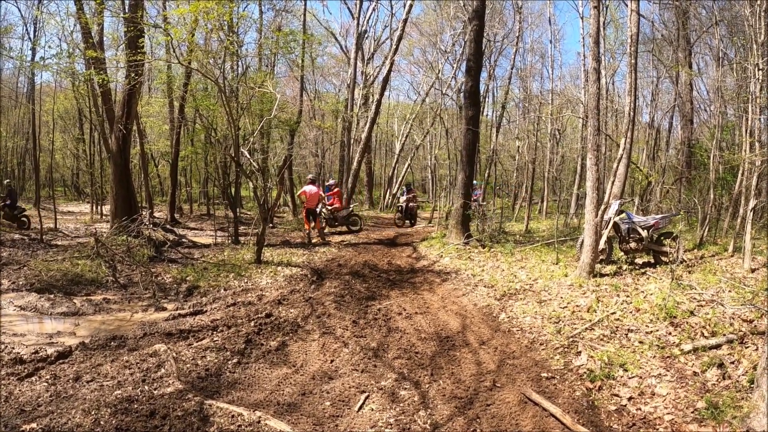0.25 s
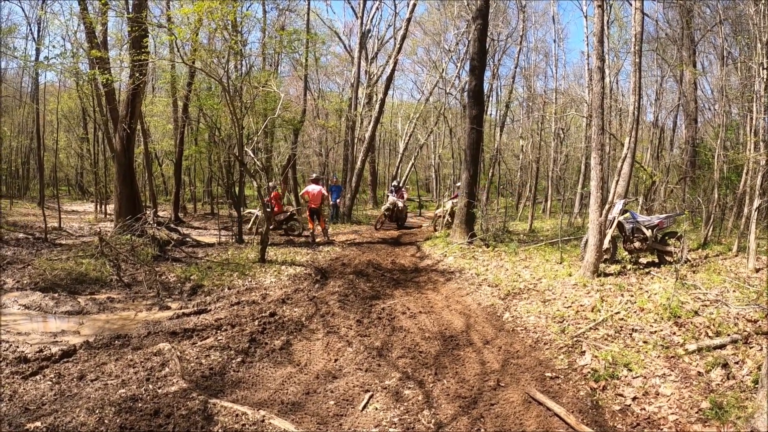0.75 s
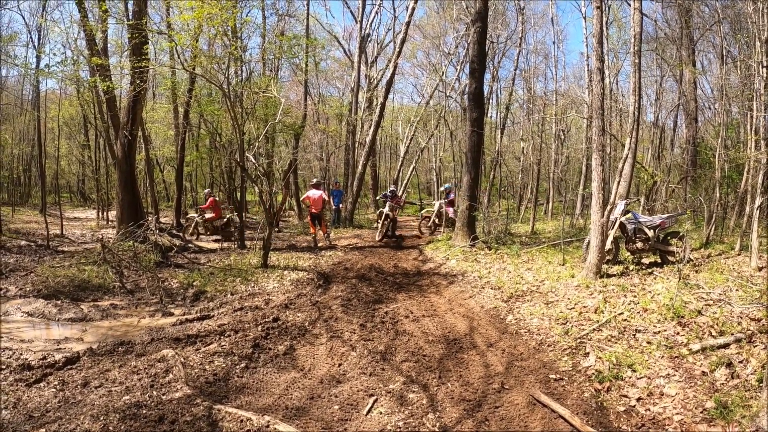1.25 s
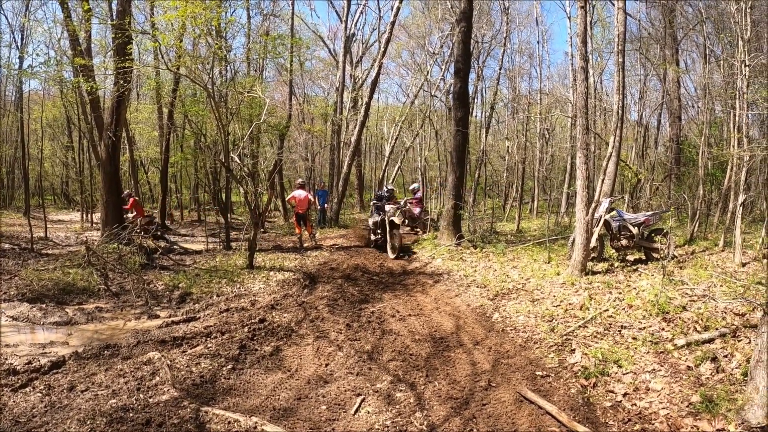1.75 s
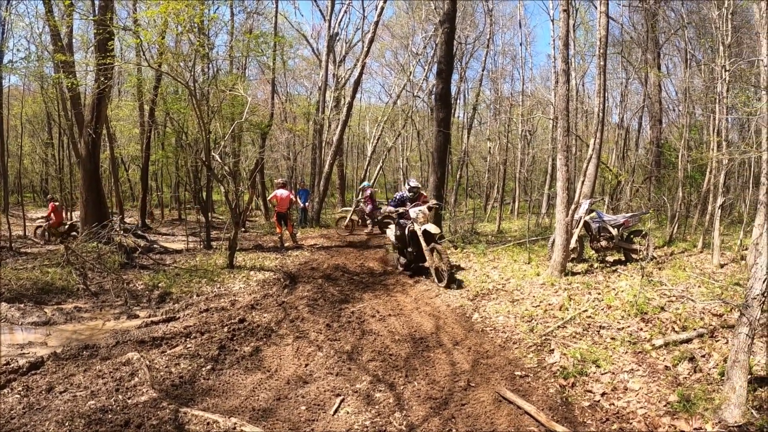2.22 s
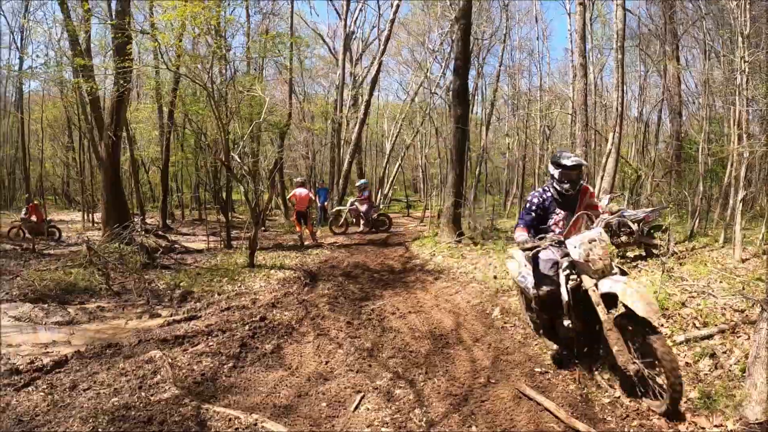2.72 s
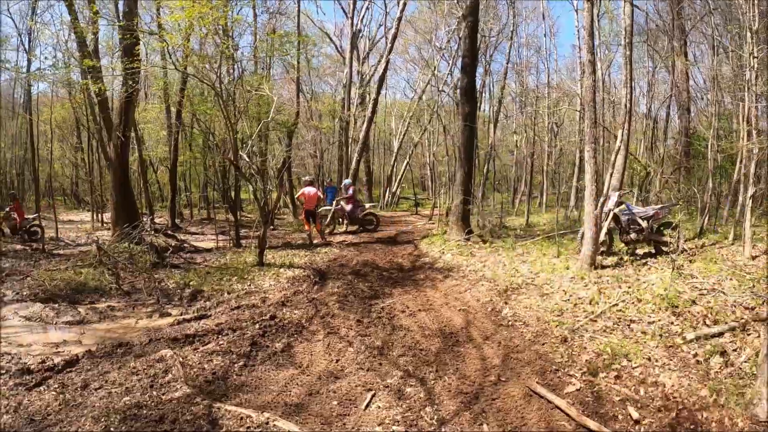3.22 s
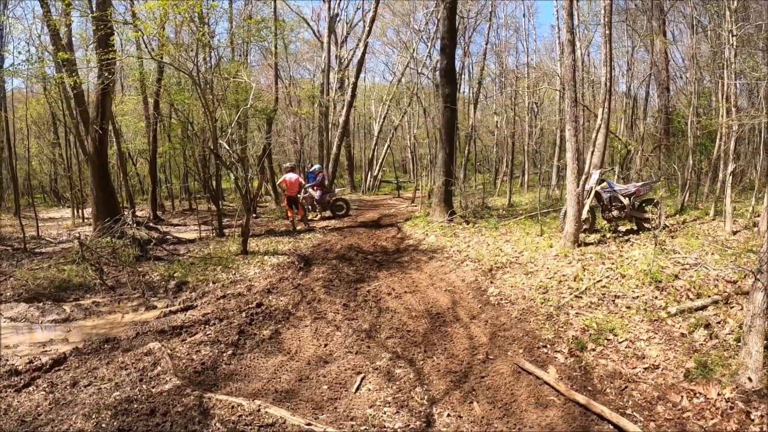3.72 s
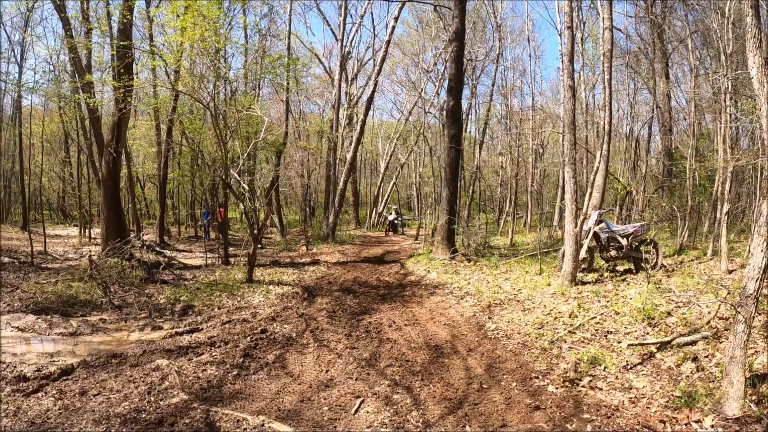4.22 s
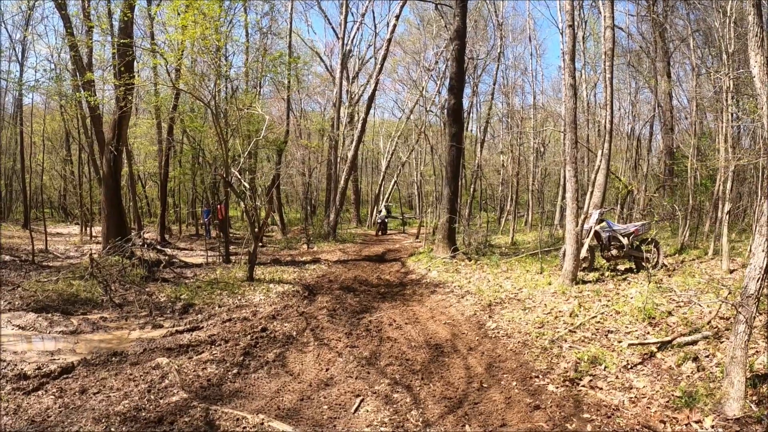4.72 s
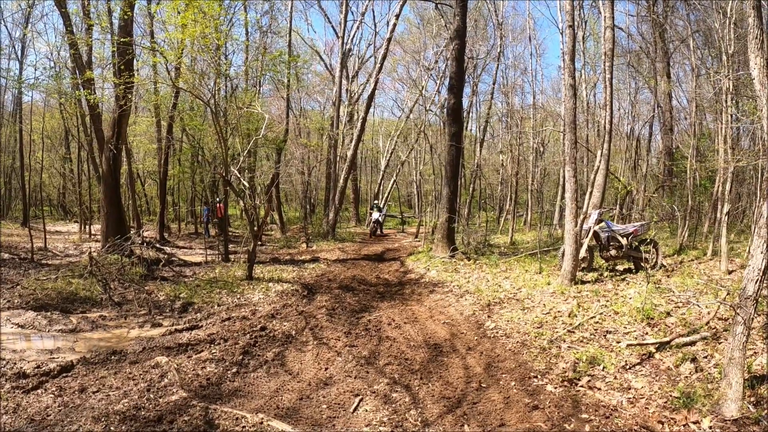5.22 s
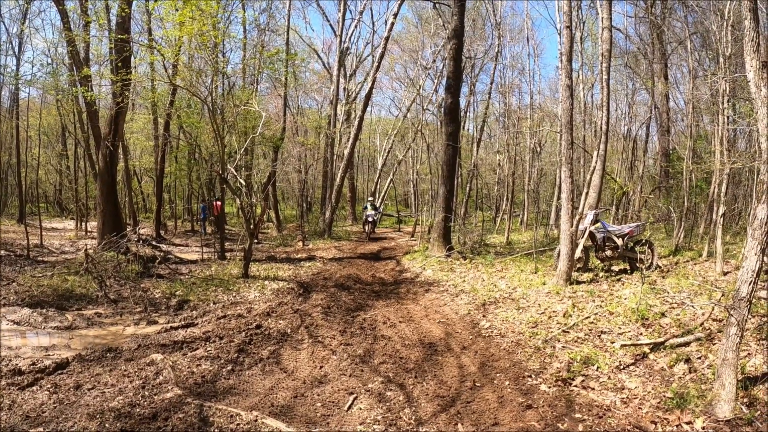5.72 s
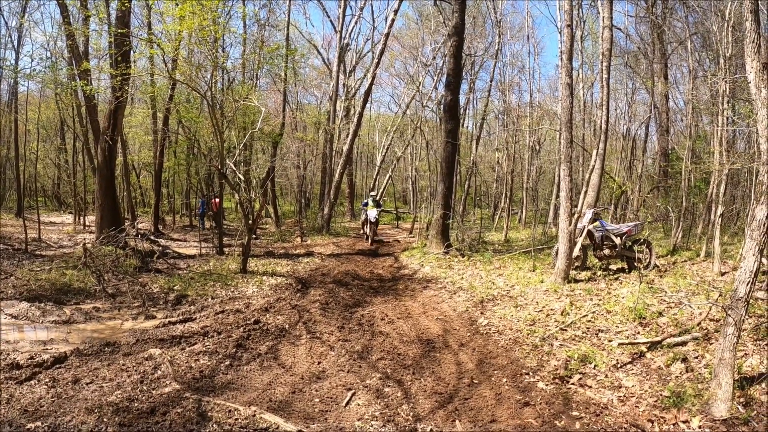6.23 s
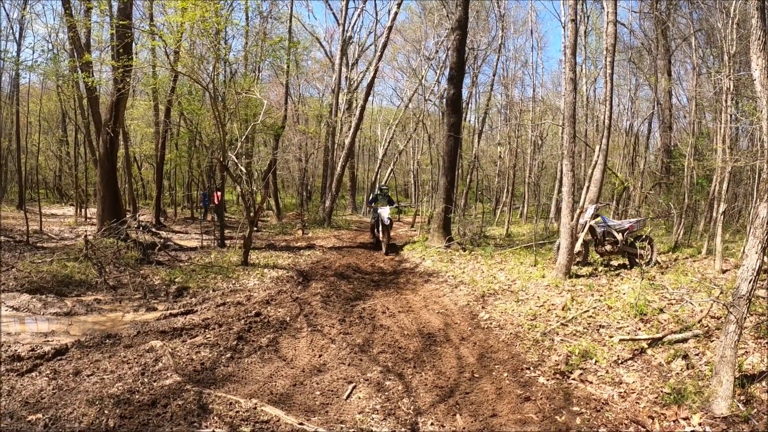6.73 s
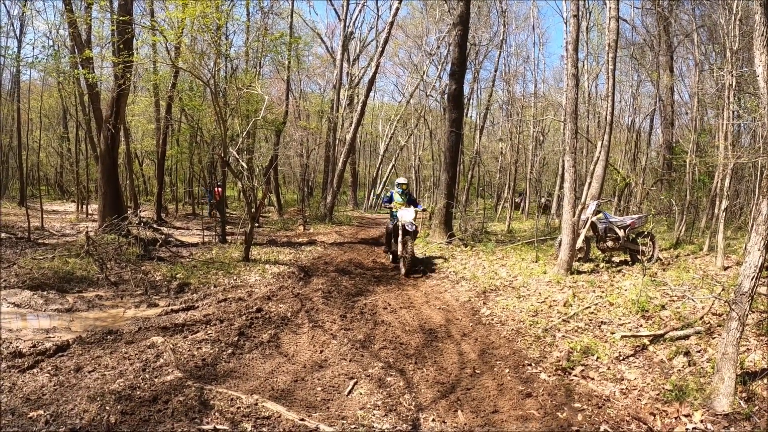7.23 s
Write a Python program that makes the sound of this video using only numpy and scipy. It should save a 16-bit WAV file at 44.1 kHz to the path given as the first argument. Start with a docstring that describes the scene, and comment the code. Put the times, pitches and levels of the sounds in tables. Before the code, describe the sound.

Lumpy motorcycle idling and quick revs, a single-cylinder engine roaring by, an abrupt brief gap, then a faster, raspier bike drawing nearer.

```python
"""Dirt bikes on a woodland trail

Waiting bikes thump at idle and one revs in short bursts; a four-stroke single pulls away and barks past
the listener. After a short silence another bike comes on, blipping its throttle. Each engine is a train of
pressure pulses, one per firing, that excites resonances of exhaust and intake, with turbulent gas as noise.
Tyres and stones are filtered noise, exhaust pops are decaying tones, and tree trunks scatter echoes."""
import sys
import numpy as np
from scipy import signal
from scipy.io import wavfile
from scipy.ndimage import uniform_filter1d

SR = 44100
rng = np.random.default_rng(int(sys.argv[2]) if len(sys.argv) > 2 else 0)


def wav_record(signal):
    """Record a signal, one row per channel, as 16-bit PCM in the file named by sys.argv[1]."""
    frames = np.transpose(np.atleast_2d(signal))
    bounded = np.clip(frames, -1, 1)
    # unit amplitude maps onto the largest positive 16-bit level
    quanta = np.round(bounded * 32767).astype(np.int16)
    wavfile.write(sys.argv[1], SR, quanta)


N = 328986
TIME = np.arange(N) / SR
RESUME_S = 4.15   # the end of the silence
THROTTLE_OPENS_S, THROTTLE_SHUTS_S = 0.027, .042   # time constants


def passing_bike():
    """Source and filter: firing pulses excite pipe and silencer, drier near by; returns body and hiss."""
    # engine speed: time_s, firings_per_s
    speed = [(1.15, 30.78), (1.44, 34.12), (1.87, 35.2), (2.04, 39.79), (2.13, 33.6), (2.35, 42.99),
             (2.48, 31.5), (2.86, 30.83), (2.97, 29.22), (3.23, 37.01), (3.33, 34.12), (3.42, 45.8),
             (3.54, 42.18), (3.71, 43.26), (3.78, 39.44), (3.87, 43.24)]
    # hotter gas carries sound faster and lifts the silencer's resonances: time_s, frequency_ratio
    gas_heat = [(1.25, 0.96), (1.8, 1.03), (2.35, 0.96), (2.6, 1.19), (2.85, 0.85), (3.35, 0.98),
                (3.62, 1.12), (3.9, 1.08)]
    # the rider pulls on the throttle: start_s, length_s, opening (0-1)
    pulls = [(1.195, .27, 0.07), (1.623, 0.43, 0.77), (2.154, 0.21, 1), (2.989, 0.42, 0.6),
             (3.353, 0.4, 0.93)]
    # level of each part, and of its echo: coasting_db, then what is added by
    # full_throttle_db, engine_going_by_db, silencer_going_by_db, mouth_facing_us_db
    mix = {"boom": (-26, 5, -2, 4, 3), "intake": (-19.5, 2.5, 5.5, -4.5, -4),
           "bark": (-30, -0.5, -3, 15.5, 7), "crack": (-29, 7, 1.8, -0.5, -0.5),
           "hiss": (-52.5, 3.5, 9.5, 1.5, 3), "echo": (2, -16, -1, -6.5, -9.5),
           "mouth": (-12.5, -9.5, 11.5, -6.5, 19.5)}
    # resonances of exhaust and intake: frequency_hz, width_hz, level_db
    boom_modes = [(43.7,16,-5.5),(76,13,2),(124.8,14,-13.5)]
    intake_modes = [(172,48,0)]
    mouth_modes = [(435,55,4.5),(590,85,-0.5)]
    crack_modes = [(790,130,1),(993,247,18),(1027,86,10.5),(1300,300,-14.5),(1630,130,-8.5),(1950,320,-5.5)]
    hiss_modes = [(3530,530,8),(4580,260,4),(5130,190,-13.5),(6650,1600,-15.5)]
    intake_tuned_rate = 35.3   # firings per s at which the intake honks as listed
    intake_follows = 0.37   # exponent of its rise with speed

    rate, = in_time(speed)
    heat, = in_time(gas_heat)
    throttle = sum(opening * swell(start, length, THROTTLE_OPENS_S, THROTTLE_SHUTS_S)
                   for start, length, opening in pulls)
    engine_by = going_by(2.983, width_s=0.19)
    silencer_by = going_by(3.215, width_s=0.16)
    mouth_faces = turning(3.32, width_s=0.027)
    causes = np.array([np.ones(N), throttle, engine_by, silencer_by, mouth_faces])
    boom_db, intake_db, bark_db, crack_db, hiss_db, wet_db, mouth_db = np.array(list(mix.values())) @ causes

    clicks = firings(rate, jitter_s=.00008, uneven_db=.6)
    boom = cut(cut(resonate(clicks, boom_modes), 230, "low", order=3), 42, "high", order=4)
    boom = woods(boom, wet_db - 9, t60=.3)

    intake_pulses = returning(delayed(clicks, .0045), share=0.88)
    honk = heated(intake_pulses, intake_modes, (rate / intake_tuned_rate) ** intake_follows)
    intake = cut(cut(honk, 260, "low", order=3), 105, "high", order=3)
    intake = woods(intake, wet_db - 13, t60=0.16)

    blasts = signal.fftconvolve(returning(clicks, share=0.67), blast())[:N]
    pipe = at_level(blasts, 0) + at_level(resonate(clicks, mouth_modes), mouth_db)
    bark = woods(cut(cut(pipe, 170, "high"), 850, "low", order=3), wet_db - 1.0, t60=0.32)

    # each burst returns once from the end of the pipe before it rings the silencer
    burst = clicks + .55 * gas(clicks, puff_s=.0035, steady=.02)
    burst = burst + .75 * cut(delayed(burst, .00525), 1500, "low")
    crack = woods(crack_band(burst, crack_modes, heat, 570, 1995), wet_db - 3.5, t60=0.49)

    rush = gas(delayed(clicks, 0.00092), puff_s=0.0071, steady=0.092)
    hiss = woods(hiss_band(rush, hiss_modes, 5280), wet_db + 5.5, t60=0.061)

    body = at_level(boom, boom_db) + at_level(bark, bark_db)
    body = body + at_level(crack, crack_db) + at_level(intake, intake_db)
    sets_off = turning(1.22, width_s=0.02)
    return sets_off * (TIME < RESUME_S) * np.array([body, at_level(hiss, hiss_db)])


def blast():
    """A decaying chirp: one firing's bark swells, then dies while its note sags as the pipe empties."""
    start_hz, end_hz, sag_s, peak_s = 439, 248, 0.01, 0.0034
    age = TIME[:SR // 20]
    hz = end_hz + (start_hz - end_hz) * np.exp(-age / sag_s)
    envelope = (age / peak_s) ** 2 * np.exp(-2 * age / peak_s)
    ring = envelope * np.sin(2 * np.pi * np.cumsum(hz) / SR)
    return ring / np.linalg.norm(ring)


def returning(x, share):
    """Reflection: a pulse comes back once from the end of the pipe."""
    return x + share * delayed(x, 0.00539)


def tyre_scrub():
    """Impact noise: knobbly tyres tear at the dirt in random grains as the passing bike swerves."""
    grit = rng.standard_normal(N) * (rng.random(N) < 3000 / SR)
    scrub = cut(resonate(grit, [(2280, 470, -5.0), (3380, 510, -4.0)]), 3900, "low", order=4)
    return going_by(2.636, width_s=0.087) * at_level(scrub, db=-37.0)


def stones():
    """Impact noise: stones flung up by the rear tyre make short gritty ticks of resonant noise."""
    # knocks: time_s, level_db (relative)
    flung = [(3.814, -29.5), (3.889, -34.5), (3.899, -31)]
    knocks = sum(from_db(db) * swell(s, .001, .0003, .003) for s, db in flung)
    grit = resonate(rng.standard_normal(N), [(2620, 900, -1), (5300, 1100, 2)])
    return knocks * cut(grit, 5900, "low", order=4)


def oncoming_bike():
    """Source and filter: a faster, rougher pulse train drives speed-tuned pipes; returns body and hiss."""
    # engine speed before its waver: time_s, firings_per_s
    speed = [(4.2, 55.8), (4.5, 55.55), (4.62, 51.6), (4.76, 54.3), (5.2, 54.7), (5.28, 58), (5.37, 62.4),
             (5.48, 63.1), (5.65, 61.2), (5.93, 63.6), (6.06, 56), (6.13, 60), (6.19, 54.5), (6.29, 65),
             (6.35, 62), (6.44, 54), (6.52, 58.5), (6.56, 56), (6.64, 61), (6.7, 59.5), (6.78, 51.5),
             (6.85, 58), (6.94, 62), (7.0, 60.5), (7.11, 49.5), (7.22, 58), (7.3, 64), (7.45, 55.6)]
    # the rider holds, then blips the throttle: start_s, length_s, opening (0-1), gulp_of_air (0-1)
    blips = [(3.998, 0.55, 0.54, 0.12), (4.643, 0.57, 0.48, 0), (5.239, 0.73, 0.87, 0.3),
             (6.122, 0.23, 0.82, 1), (6.476, 0.26, 0.77, 1), (6.784, 0.22, 0.73, 0.27),
             (7.144, 0.22, 0.68, 0.8)]
    # level of each part (the hiss also sets the edge): coasting_db, then what is added by
    # full_throttle_db, full_gulp_db, nearing_db_per_s, close_by_db
    mix = {"boom": (-32.5, 6.5, 2, 2.5, -1), "note": (-43, 21.5, 3.5, 1.3, 1),
           "bark": (-38, 6.5, 6.5, 1.6, 0.5), "crack": (-33, 4.5, 1, 1.76, 21),
           "hiss": (-65.5, 13, 0, 3, 1)}
    # exhaust resonances: frequency_hz, width_hz, level_db
    boom_modes = [(69.5,25,-1.5),(115,32,2.5),(188,19,-1)]
    note_modes = [(247.7,35,0)]
    bark_modes = [(340.4,45,3),(391,50,4),(438,38,0.5),(665,110,-10.5)]
    crack_modes = [(938,81,-13),(984,40,3),(1145,64,8.5)]
    edge_modes = [(1646,81,-11),(2023,130,-14.5)]
    hiss_modes = [(2980,180,7),(3650,1200,-2.5),(4730,1000,13.5),(5100,120,12.5),(5850,400,-4)]
    pipe_tuned_rate = 61.06   # firings per s at which the pipe's low notes are as listed
    pipe_follows, heat_follows = 0.68, 0.51   # exponents of the rise with speed: low notes, silencer
    speed_waver, heat_waver, wavers_per_s = 0.00301, 0.049, 12   # never quite still: share, share, per s
    putter_db, putters_per_s = 3, 45   # the low thuds come unevenly: spread, changes per s
    gulp_s = 0.1   # the intake growls until the engine catches up with the throttle

    throttle = sum(opening * swell(start, length, THROTTLE_OPENS_S, THROTTLE_SHUTS_S)
                   for start, length, opening, _ in blips)
    gulps = sum(gulp * swell(start, gulp_s, THROTTLE_OPENS_S, THROTTLE_SHUTS_S)
                for start, _, _, gulp in blips)
    rate, = in_time(speed)
    rate = rate * (1 + speed_waver * waver(wavers_per_s))
    relative_speed = rate / pipe_tuned_rate
    heat = relative_speed ** heat_follows + heat_waver * waver(wavers_per_s)
    pipe_heat = relative_speed ** pipe_follows
    causes = np.array([np.ones(N), throttle, gulps, TIME - RESUME_S, going_by(7.66, width_s=0.1)])
    boom_db, note_db, bark_db, crack_db, hiss_db = np.array(list(mix.values())) @ causes

    clicks = firings(rate, jitter_s=.00012, uneven_db=1.5)
    burst = clicks + .35 * gas(clicks, puff_s=.005, steady=.25)
    thuds = clicks * from_db(putter_db * waver(putters_per_s))
    boom = cut(cut(heated(thuds, boom_modes, pipe_heat), 230, "low", order=5), 64, "high", order=4)
    boom = woods(boom, -9, t60=.2)
    note = cut(cut(heated(clicks, note_modes, pipe_heat), 200, "high", order=3), 320, "low", order=3)
    bark = cut(cut(heated(burst, bark_modes, pipe_heat), 280, "high", order=3), 490, "low")
    bark = woods(bark, -9, t60=.18)

    ring = cut(crack_band(burst, crack_modes, heat, 884, 2410), 806, "low", order=3)
    edge = cut(cut(heated(burst, edge_modes, heat), 1600, "high"), 1975, "low", order=12)
    # an open throttle sharpens the note
    crack = woods(ring + from_db(1.2 * (hiss_db + 47.5)) * edge, -2, t60=.22)
    hiss = hiss_band(gas(clicks, puff_s=0.016, steady=0.59), hiss_modes, 5220)

    body = at_level(boom, boom_db) + at_level(bark, bark_db)
    body = body + at_level(crack, crack_db) + at_level(note, note_db)
    return (TIME > RESUME_S) * np.array([body, at_level(hiss, hiss_db)])


def pops():
    """Damped oscillation: unburnt fuel knocks dully in the oncoming silencer now and then."""
    # knocks: time_s, onset_level_db (before the low-pass)
    knocks = [(4.503, -19), (4.762, -23), (5.71, -21)]
    out = np.zeros(N)
    for s, db in knocks:
        age = np.maximum(TIME - s, 0)
        out += from_db(db - 60 * age / 0.034) * np.sin(2 * np.pi * 630 * age)
    return cut(out, 1200, "low", order=3)


def revving_bike():
    """Source and filter: bursts of throttle drive pipe resonances that rise with the engine speed."""
    # bursts: start_s, length_s, first_firings_per_s, last_firings_per_s, boom_db, crack_db,
    # pipe_note_at_end (frequency ratio)
    bursts = [(0, 0.056, 58, 65, -17, -43, 1.09), (0.07, 0.11, 55, 66, -16.5, -41, 1.08),
              (0.752, 0.16, 55.5, 64, -22.5, -48.5, 1.27), (1.168, .02, 30, 30, -20.5, -22.5, 1.05),
              (1.196, .155, 36.5, 51, -22, -25, 1.18), (1.392, .29, 63, 71, -18.5, -34, 1.12),
              (2.43, 0.23, 54, 82, -38, -28, 1.35), (2.655, 0.27, 74, 63, -26, -38.5, 0.92)]
    # exhaust resonances: frequency_hz, width_hz, level_db
    boom_modes = [(174,20,-17),(253.7,19,2.5),(317,21,-14.5)]
    crack_modes = [(870,330,-5.5),(1154,110,13.5),(1800,360,-24)]
    attack_s, release_s = 0.0037, 0.028
    pipe_follows = 0.98   # exponent of the pipe note's rise with speed
    silencer_heat = 1.052   # frequency ratio

    clicks = boom_gain = crack_gain = 1e-5
    pipe_heat = 1
    for start, length, first_rate, last_rate, boom_db, crack_db, note in bursts:
        rate = np.interp(TIME, [start, start + length], [first_rate, last_rate], left=0)
        throttle = swell(start, length, attack_s, release_s)
        # each burst takes over the pulse train from its start
        burst_clicks = firings(rate, jitter_s=.00007, uneven_db=.8)
        clicks = np.where(TIME < start - 1 / SR, clicks, burst_clicks)
        pipe_heat = np.where(rate > 0, note * (rate / last_rate) ** pipe_follows, pipe_heat)
        boom_gain = boom_gain + from_db(boom_db) * throttle
        crack_gain = crack_gain + from_db(crack_db) * throttle
    boom = woods(cut(heated(clicks, boom_modes, pipe_heat), 380, "low", order=3), -16, t60=.2)
    burst = clicks + 0.3 * gas(clicks, puff_s=0.003, steady=0.08)
    crack = woods(crack_band(burst, crack_modes, silencer_heat, 630, 2100), -7, t60=0.14)
    return boom_gain * at_level(boom, 0) + crack_gain * at_level(crack, 0)


def waiting_bikes():
    """Two slow pulse trains in resonant pipes: a near lope, a farther thump; returns body and hiss."""
    # speed of the nearest bike: time_s, firings_per_s
    near_speed = [(0,19.72),(.38,19.89),(.52,19.81),(.59,27.89),(.68,28.06),(.75,23.07),(.81,34.21),(.87,18.27),(.95,24.58),(1.08,23.15),(1.16,34.81),(4,25),(7.4,27.5)]
    # levels: time_s, near_lope_db, far_thump_db, rasp_db (relative; offset below for rasp and hiss)
    levels = [(0, -26.5, -20.5, -29), (.42, -23.5, -18.5, -36.5), (.6, -16, -19, -31.5),
              (.85, -22.5, -17.5, -34.5), (1.15, -15, -20.5, -31), (1.5, -19.5, -23.5, -28),
              (2.35, -23.5, -23, -31), (2.6, -30.5, -18.5, -29), (3.15, -33, -27.5, -32),
              (3.6, -37, -34.5, -37), (4.45, -29, -21.5, -34.5), (6.0, -31.5, -24, -38),
              (7.4, -23.5, -21, -34.5)]
    # exhaust resonances: frequency_hz, width_hz, level_db
    lope_modes = [(170.1,34,-5.5),(262,34,-16.5)]
    thump_modes = [(69,38,-0.5),(93,9.5,-5),(133.9,31,-1.5)]
    rasp_modes = [(500,120,2),(750,20,5.5),(997,300,12.5),(1224,95,7.5),(1690,910,-9.5),(2110,150,-10)]
    hiss_modes = [(3460,840,5.5),(4540,270,-6.5)]
    far_rate, far_hunt, far_hunts_per_s = 29.5, .12, 13   # mean firings per s, share, changes per s
    silencer_heat = 0.92   # frequency ratio

    rate, = in_time(near_speed)
    lope_db, thump_db, rasp_db = in_time(levels)
    near = firings(rate, jitter_s=.0004, uneven_db=1)
    hunting_rate = far_rate * (1 + far_hunt * waver(far_hunts_per_s))
    far = firings(hunting_rate, jitter_s=.0015, uneven_db=2)
    lope = cut(cut(resonate(near, lope_modes), 340, "low", order=3), 90, "high")
    lope = woods(lope, -10, t60=.3)
    thump = cut(cut(resonate(far, thump_modes), 300, "low", order=3), 54, "high", order=4)
    thump = woods(thump, -1.5, t60=0.44)
    clicks = near + 0.4 * far
    rasp = crack_band(gas(clicks, puff_s=0.023, steady=2.6), rasp_modes, silencer_heat, 250, 2021)
    hiss = hiss_band(gas(clicks, puff_s=0.012, steady=4.2), hiss_modes, 5400)
    body = at_level(lope, lope_db) + at_level(thump, thump_db) + at_level(rasp, rasp_db + 2.5)
    return np.array([body, at_level(hiss, rasp_db - 18.5)])


def firings(rate, jitter_s, uneven_db):
    """Pulse train: one click per firing; no two burns are quite alike in strength or timing."""
    at = np.flatnonzero(np.diff(np.ceil(np.cumsum(rate) / SR), prepend=0))
    chance = rng.standard_normal((800, 2))[:len(at)]
    shift = (jitter_s * SR * chance[:, 0]).astype(int)
    clicks = np.zeros(N)
    clicks[np.clip(at + shift, 0, N - 1)] = from_db(uneven_db * chance[:, 1])
    return clicks


def gas(clicks, puff_s, steady):
    """Turbulence: noise bursts out with each firing and dies to a steady rush; as strong as the clicks."""
    r = np.exp(-1 / (puff_s * SR))
    puffs = signal.lfilter([1], [1, -r], clicks + 1e-18)
    noise = rng.standard_normal(N) * (puffs + steady * puffs.mean())
    return noise * np.std(clicks) / np.std(noise)


def resonate(x, modes):
    """Modal resonance: two-pole resonators in parallel, each of gain 1 at its top before its level."""
    out = 0
    for hz, width, db in modes:
        r = np.exp(-np.pi * width / SR)
        poles = [1, -2 * r * np.cos(2 * np.pi * hz / SR), r * r]
        out = out + from_db(db) * (1 - r * r) / 2 * signal.lfilter([1, 0, -1], poles, x + 1e-18)
    return out


def heated(x, modes, heat):
    """Sound speed scales resonance: modes ring on a clock that runs faster when the gas is hot."""
    clock = np.cumsum(heat * np.ones(N))
    ticks = np.arange(int(clock[-1]) + 1)
    ringing = resonate(np.interp(ticks, clock, cut(x, 5500, "low")), modes)
    return np.interp(clock, ticks, ringing)


def crack_band(x, modes, heat, low_hz, high_hz):
    """Band limiting: the silencer's middle resonances, cut steeply above."""
    return cut(cut(heated(x, modes, heat), low_hz, "high", order=3), high_hz, "low", order=12)


def hiss_band(x, modes, top_hz):
    """Jet noise: the sizzle of gas at the pipe's mouth, with a little air on top."""
    sizzle = cut(cut(resonate(x, modes), 2500, "high", order=8), top_hz, "low", order=4)
    air = resonate(x, [(11000, 1500, 0)])
    return sizzle + from_db(-36.5) * air * np.std(sizzle) / np.std(air)


def swell(start, length, attack_s, release_s):
    """Exponential relaxation: rise towards 1 from the start, hold, then die away."""
    age = TIME - start
    rise = 1 - np.exp(-np.clip(age, 0, length) / attack_s)
    return rise * np.exp(-np.maximum(age - length, 0) / release_s)


def going_by(s, width_s):
    """Inverse-square nearness of something that passes in a straight line: 1 at the closest point."""
    return 1 / (1 + ((TIME - s) / width_s) ** 2)


def turning(s, width_s):
    """A sigmoid: a smooth step from 0 to 1."""
    return (1 + np.tanh((TIME - s) / width_s)) / 2


def waver(per_s):
    """Low-frequency randomness: straight lines between chance values of spread 1."""
    return np.interp(TIME * per_s, np.arange(400), rng.standard_normal(400))


def from_db(db):
    """The decibel law: decibels to amplitude gain."""
    return 10 ** (np.asarray(db) / 20)


def in_time(rows):
    """Linear interpolation: each column of a curve at every sample."""
    s, *columns = np.transpose(rows)
    return [np.interp(TIME, s, c) for c in columns]


def cut(x, hz, kind, order=2):
    """Butterworth filtering: a maximally flat low- or high-pass."""
    return signal.sosfilt(signal.butter(order, min(hz, .45 * SR), kind, fs=SR, output="sos"), x)


def at_level(x, db):
    """Power normalisation: hold the power, averaged over a few firings, at the given level."""
    power = uniform_filter1d(uniform_filter1d(x * x, size=3600), size=2800)
    return from_db(db) * x / np.sqrt(np.abs(power) + 1e-5 * np.mean(x * x))


def delayed(x, s):
    """Propagation delay: the sound, later by s seconds."""
    return np.interp(TIME - s, TIME, x, left=0)


def woods(x, wet_db, t60):
    """Multiple scattering: the trunks add many small echoes that decay by 60 dB in t60 seconds."""
    t = TIME[:SR]
    sparse = (rng.random(SR) < .03) * (t > .008)
    trunks = rng.standard_normal(SR) * sparse * from_db(-60 * t / t60)
    echoes = signal.fftconvolve(x, trunks / np.linalg.norm(trunks))[:N]
    return x + from_db(wet_db) * echoes


def scene():
    """Superposition: the low sound is nearly alike in both channels; the hiss has a phase-shifted side."""
    # stereo image: time_s, left_minus_right_db (low sound), hiss_side_gain (0-1)
    image = [(0,.5,0.3),(2,1.24,0.72),(3.9,1.65,0.57),(4.15,0,0),(6.5,0,0.022),(7.4,0.9,0.49)]
    body, hiss = passing_bike() + oncoming_bike() + waiting_bikes()
    body = body + revving_bike() + pops() + tyre_scrub()
    hiss = hiss + stones()
    left_db, width = in_time(image)
    # lag of the right channel: time_s, lag_s
    lag_s, = in_time([(0, 0), (.6, 0), (1.3, .00004), (3.9, .00004), (4.15, 0)])
    pair = np.array([body * from_db(left_db / 2), delayed(body, lag_s) * from_db(-left_db / 2)])
    quarter_turn = np.imag(signal.hilbert(hiss))   # every partial shifted by 90 degrees
    side = width * woods(quarter_turn, -3, t60=.1)
    return pair + hiss + side * np.array([[1], [-1]])


def record(dry):
    """Saturation and band limiting: peaks are rounded, the sound stops dead, fades back in, loses its top."""
    before = np.clip((3.923 - TIME) / .002, 0, 1)
    after = np.clip((TIME - RESUME_S) / .085, 0, 1) ** 2
    rounded = 1.1 * np.tanh(dry / 1.1)
    return cut(rounded * (before + after), 13000, "low", order=12)


dry = scene()
out = record(dry)
wav_record(out)
```